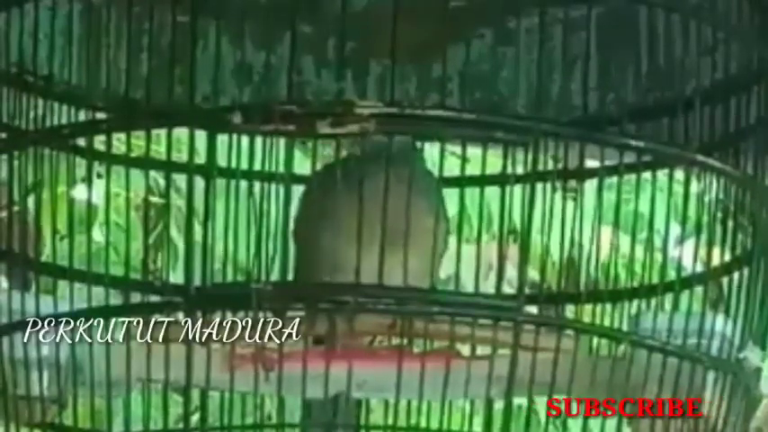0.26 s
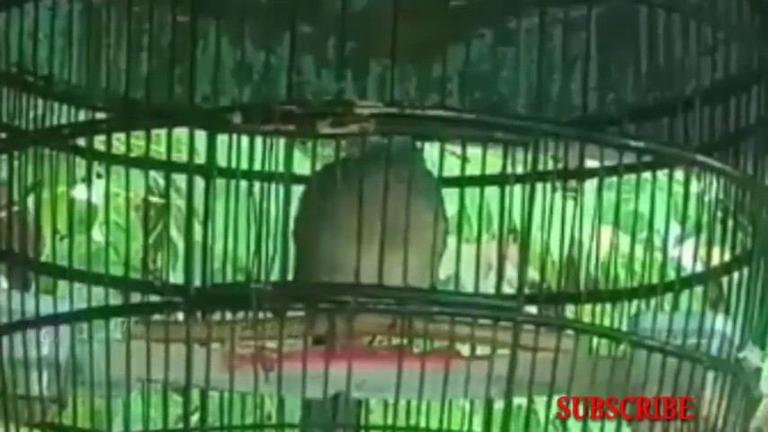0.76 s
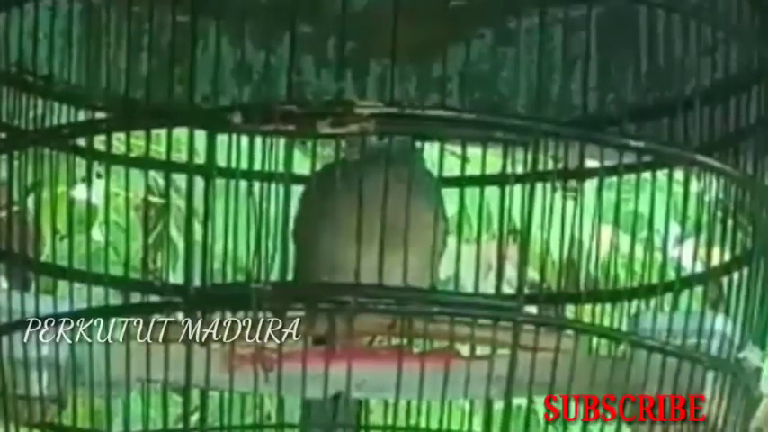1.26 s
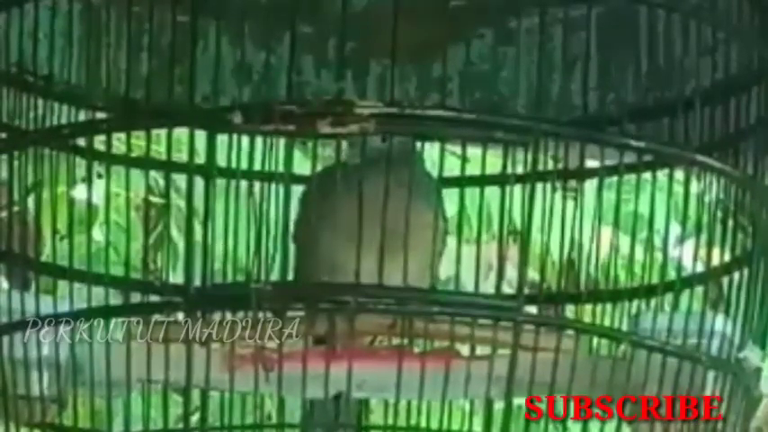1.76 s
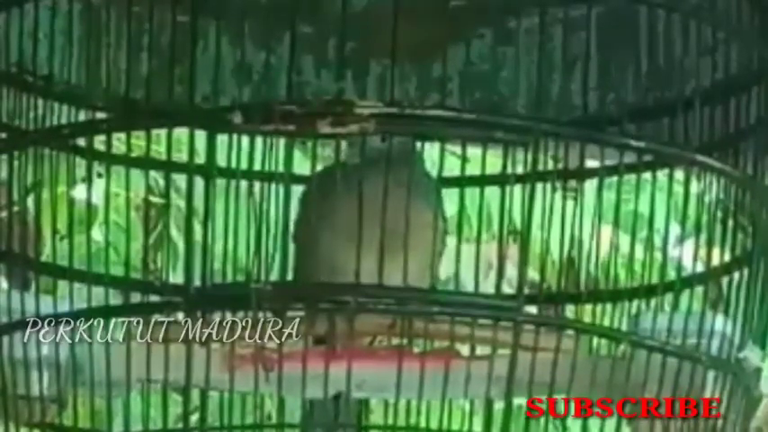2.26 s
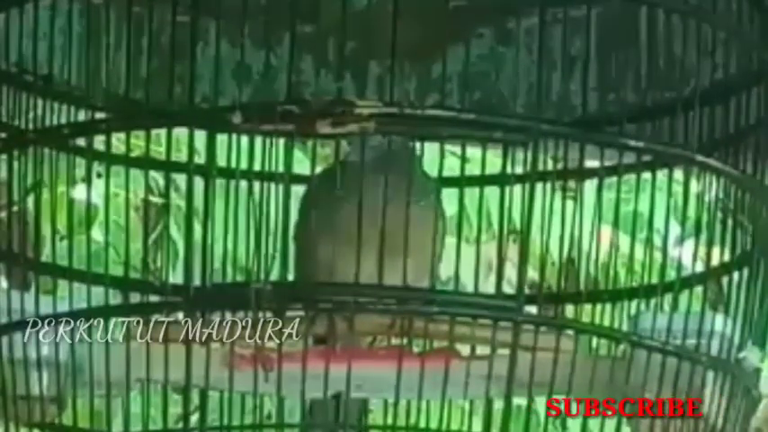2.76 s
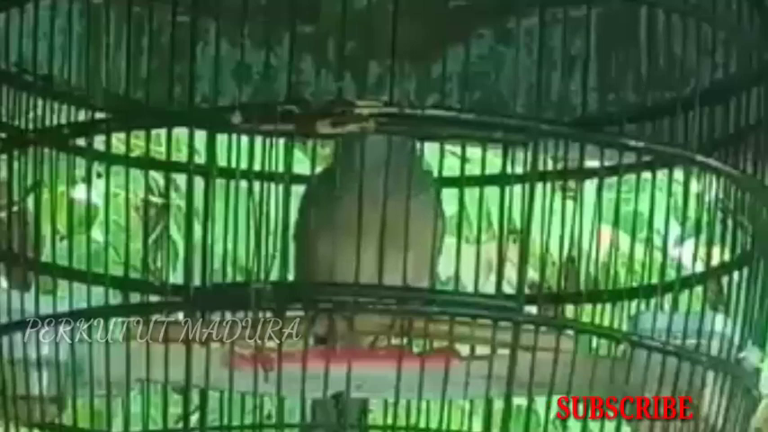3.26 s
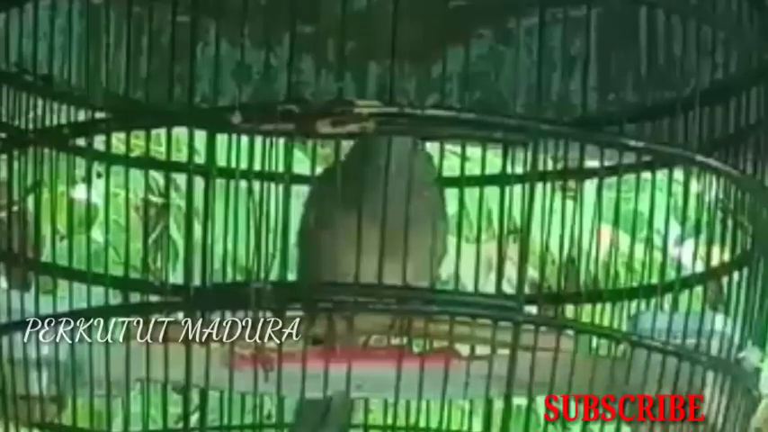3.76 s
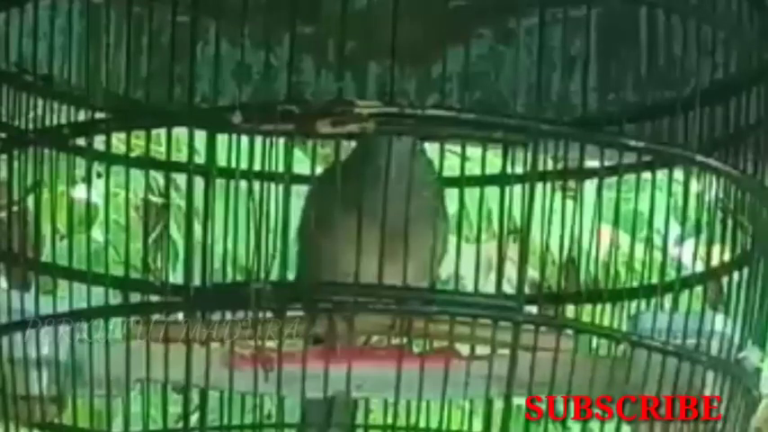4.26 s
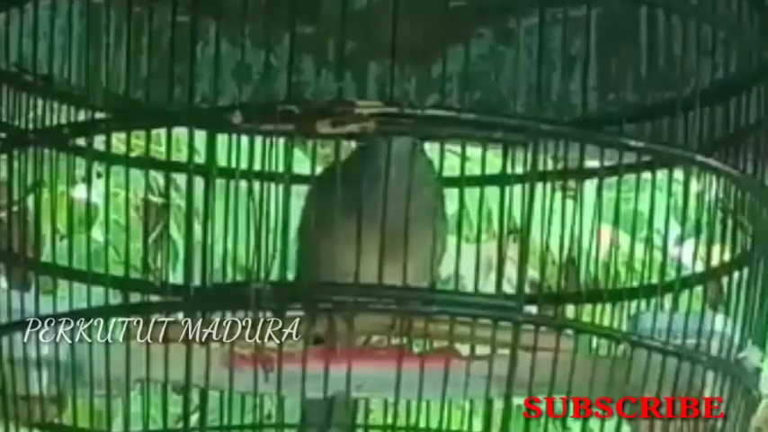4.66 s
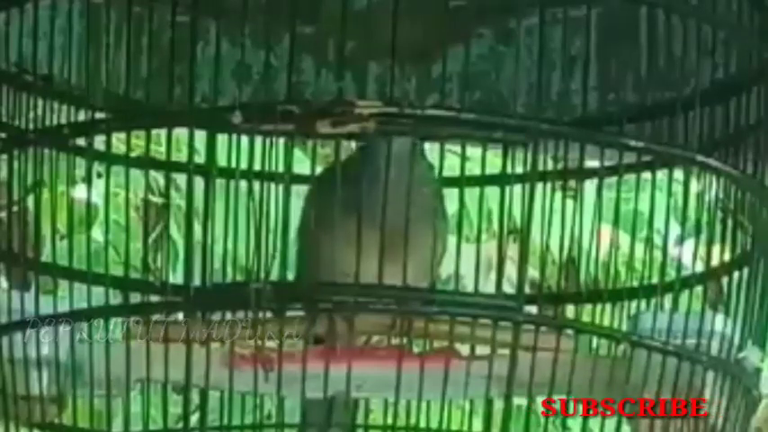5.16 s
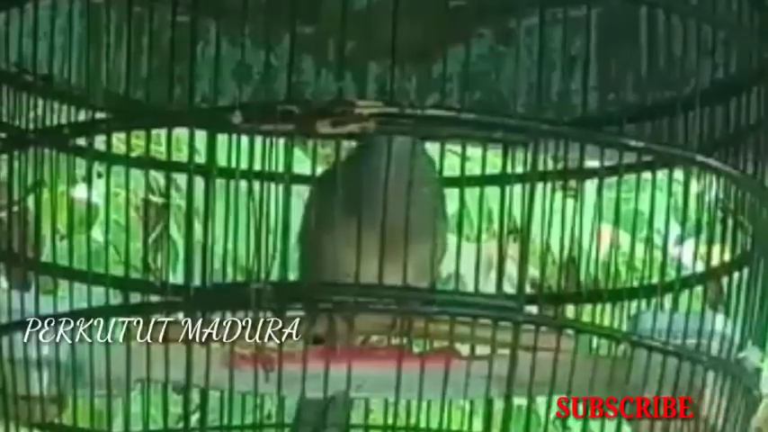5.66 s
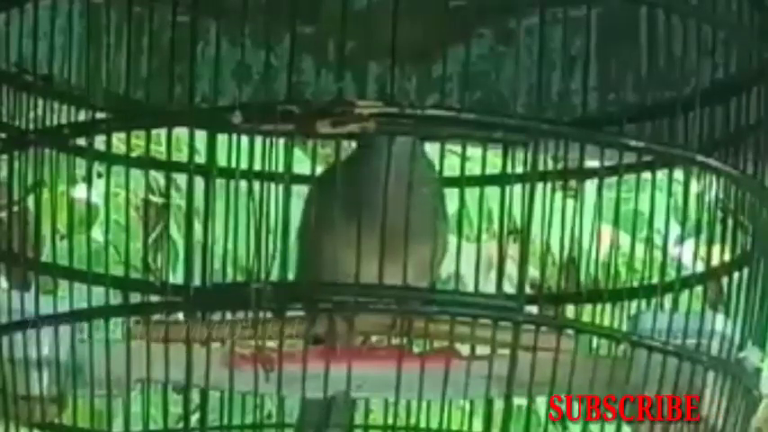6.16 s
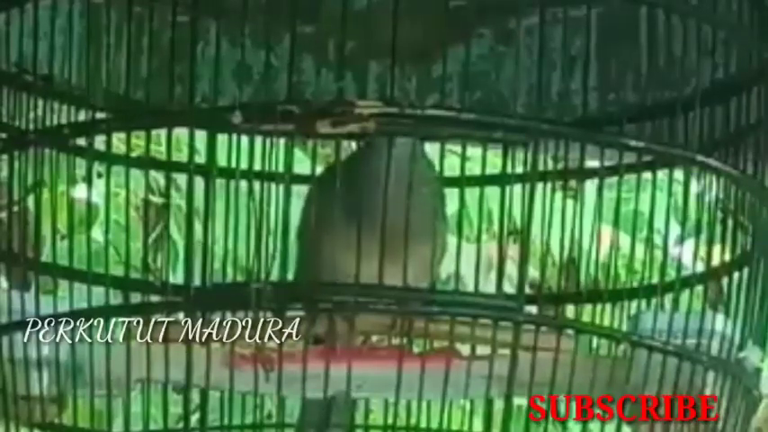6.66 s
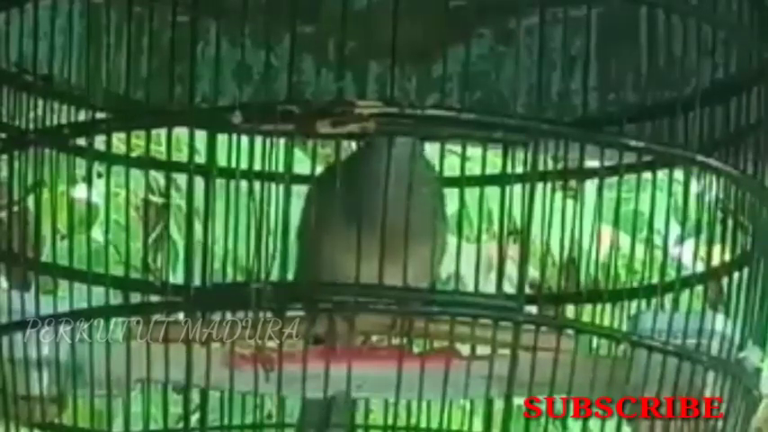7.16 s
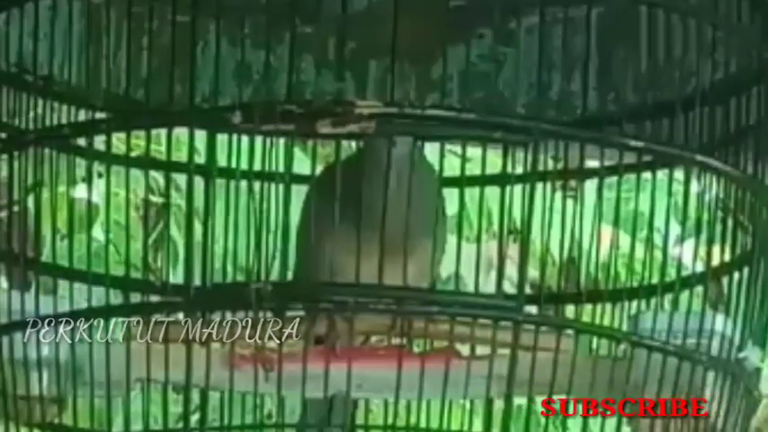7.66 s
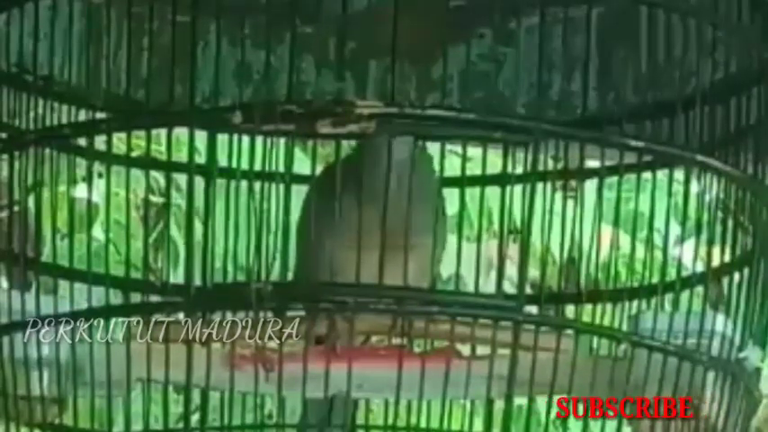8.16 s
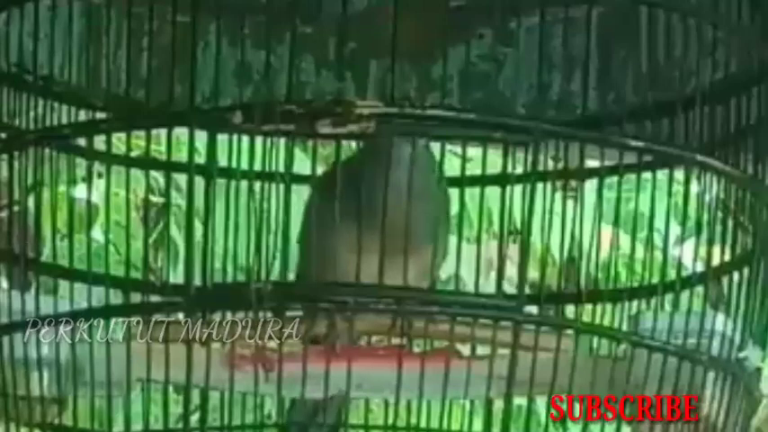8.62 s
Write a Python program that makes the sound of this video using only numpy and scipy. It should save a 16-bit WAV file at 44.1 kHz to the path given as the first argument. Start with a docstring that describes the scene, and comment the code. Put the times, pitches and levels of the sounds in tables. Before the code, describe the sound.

A dove coos four mellow, rolling phrases close by while another answers further off, over faint hiss and engine hum.

```python
"""Zebra doves on a porch

A caged zebra dove coos four phrases on a reverberant porch; a second answers from further off.
Each note is an almost pure tone from the syrinx that scoops up and usually sags; wall echoes beat on it.
A distant engine hums over road rumble, a hiss lies to the left, and there are light ticks and scuffs
on the cage and bright rustles. Small birds twitter far off, and a faint whistle rises at the end."""
import sys
import numpy as np
from scipy import signal
from scipy.fft import rfft, irfft, next_fast_len
from scipy.io import wavfile
from scipy.ndimage import uniform_filter1d

SR = 44100
rng = np.random.default_rng(int(sys.argv[2]) if len(sys.argv) > 2 else 0)


def generate_wav(sig):
    """Save sig (samples, or channels by samples) to the path in sys.argv[1] as 16-bit PCM at SR."""
    pcm = np.round(np.clip(np.atleast_2d(sig).T, -1, 1) * 32767).astype(np.int16)
    wavfile.write(sys.argv[1], SR, pcm)


N = 392049
TIME = np.arange(N) / SR


def from_db(db):
    """Decibels to gain."""
    return 10 ** (np.asarray(db) / 20)


def unit_rms(x):
    """Scale to rms 1."""
    return x / np.sqrt(np.mean(x ** 2) + 1e-20)


def curves(rows):
    """Interpolate rows of (time_s, values...) to every sample, one curve per value column."""
    time_s, *columns = np.transpose(rows)
    return [np.interp(TIME, time_s, column) for column in columns]


def pan(left_db):
    """Ear gains for a left-minus-right level difference."""
    return from_db(np.array([[left_db], [-left_db]]) / 2)


def delayed(x, delay_s):
    """Fractional delay."""
    return np.interp(TIME - delay_s, TIME, x, left=0)


def drift(rate_hz, size=N):
    """Smooth random wander, rms about 1, rolling off above rate_hz."""
    step = 16
    knots = next_fast_len(size // step + 2)
    hz = np.arange(knots // 2 + 1) * SR / step / knots
    spectrum = rfft(rng.standard_normal(knots)) / (1 + (hz / rate_hz) ** 4)
    return np.interp(np.arange(size) / step, np.arange(knots), unit_rms(irfft(spectrum, knots)))


def noise(colour):
    """Noise of rms 1, shaped by rows of (freq_hz, density_db)."""
    size = next_fast_len(N)
    hz, db = np.transpose(colour)
    bin_hz = np.maximum(np.arange(size // 2 + 1) * SR / size, 1)
    low_cut = np.minimum(bin_hz / hz[0], 1) ** 2
    gain = from_db(np.interp(np.log(bin_hz), np.log(hz), db)) * low_cut
    return unit_rms(irfft(rfft(rng.standard_normal(size)) * gain, size)[:N])


def bursts(events, colour, rise_s):
    """Decaying stereo noise puffs from rows of (start_s, level_db, t60_s, left_db)."""
    envelope, t = np.zeros((2, N + SR)), TIME[:SR]
    rise = 1 - np.exp(-t / rise_s)
    for start_s, db, t60_s, left_db in events:
        at = int(start_s * SR)
        envelope[:, at:at + SR] += pan(left_db) * from_db(db - 60 * t / t60_s) * rise
    return envelope[:, :N] * np.array([noise(colour), noise(colour)])


def porch(x, build_s=0.013, t60_s=0.39):
    """Diffuse stereo tail that builds and decays, flattened to favour no pitch."""
    t = TIME[:SR]
    tail = rng.standard_normal((2, SR)) * from_db(-60 * t / t60_s) * (1 - np.exp(-t / build_s))
    response = rfft(tail, 2 * SR)
    response /= np.sqrt(uniform_filter1d(np.abs(response) ** 2, size=80, axis=1))
    return signal.fftconvolve(x[None], irfft(response)[:, :SR], axes=1)[:, :N]


# Engine speed: time_s, cycle_hz
ENGINE_CYCLES = [(0, 28.6), (3, 27.5), (5.7, 21.4), (6.15, 26), (6.55, 23), (7.1, 27.3), (7.5, 30),
                 (7.9, 26.3), (8.2, 28.8), (8.89, 24.7)]
# Engine loudness: time_s, level_db
ENGINE_ENVELOPE = [(0, -42.5), (.5, -41.5), (.75, -44.5), (1.75, -53), (1.95, -37.5), (2.25, -52),
                   (2.95, -38.5), (3.8, -54), (4.2, -40.5), (4.6, -53.5), (5.8, -48), (6.25, -30),
                   (6.75, -46.5), (7.35, -38.5), (8.1, -29), (8.6, -34), (8.89, -35)]


def engine(exhaust_hz=125.1, exhaust_width_hz=26, waver_db=1.0):
    """Orders 4 and 5 throb together as the speed wanders; the exhaust resonance favours the nearer."""
    order_hz = np.outer([4, 5], curves(ENGINE_CYCLES)[0])
    orders = np.sin(2 * np.pi * np.cumsum(order_hz, axis=1) / SR)
    weights = 1 / (1 + (2 * (order_hz - exhaust_hz) / exhaust_width_hz) ** 2)
    hum = np.sum(weights * orders, axis=0) / np.linalg.norm(weights, axis=0)
    return from_db(curves(ENGINE_ENVELOPE)[0] - waver_db * drift(4.4)) * hum


# Road rumble spectrum: freq_hz, density_db
ROAD_COLOUR = [(20, -30), (40, -18), (65, -6.5), (120, 1), (200, -5), (300, -14.5), (450, -19.5),
               (900, -19), (2000, -45)]
# Road rumble loudness: time_s, level_db
ROAD_ENVELOPE = [(0, -45.5), (2, -44), (5, -41), (7.5, -40), (8.89, -41)]


def traffic(surge_db=2.0, scatter_db=-13, lag_s=0.00097):
    """The engine over a surging road rumble, reaching the left ear later."""
    rumble_gain = from_db(curves(ROAD_ENVELOPE)[0] + surge_db * drift(20))
    road = engine() + rumble_gain * noise(ROAD_COLOUR)
    scattered = from_db(scatter_db) * rumble_gain * np.array([noise(ROAD_COLOUR), noise(ROAD_COLOUR)])
    return pan(3.4) * (np.array([delayed(road, lag_s), road]) + scattered)


def patchy(x, depth_db, rate_hz=14, lowest_hz=350):
    """Each of ten half-octave bands swells and sinks on its own; output rms 1."""
    size = next_fast_len(N)
    spectrum, out = rfft(x, size), 0
    bin_hz = np.maximum(np.arange(len(spectrum)) * SR / size, 1)
    band_index = np.clip(2 * np.log2(bin_hz / lowest_hz), 0, 9)
    knots_s = np.arange(0, N / SR + 1, 1 / rate_hz)
    for k in range(10):
        wander = np.interp(TIME, knots_s, rng.standard_normal(len(knots_s)))
        band = irfft(spectrum * np.maximum(1 - np.abs(band_index - k), 0), size)[:N]
        out = out + from_db(depth_db * wander) * band
    return unit_rms(out)


# Hiss spectrum at each ear: freq_hz, density_db
LEFT_HISS_COLOUR = [(300, -34.5), (500, -8.5), (750, -2.5), (1100, 3), (1600, 5.5), (2300, 6.5), (3300, 2),
                    (4800, -1), (6400, -2.5), (8500, -15.5), (11000, -27.5), (15000, -43.5)]
RIGHT_HISS_COLOUR = [(300, -12.5), (500, -14), (800, -9), (1400, -3), (2300, -9.5), (4000, -18.5),
                     (6500, -21.5), (8800, -10.5), (11000, -19), (13000, -23), (15000, -47.5)]


def hiss(left_db=-35.5, right_db=-46.0, flicker_db=1.18, grain_db=0.7):
    """Shifting, slightly grainy hiss on the left; a weaker, steadier one on the right."""
    left_gain = from_db(left_db + flicker_db * drift(19) + grain_db * drift(300))
    left = left_gain * patchy(noise(LEFT_HISS_COLOUR), depth_db=1.7)
    right = from_db(right_db) * patchy(noise(RIGHT_HISS_COLOUR), depth_db=-0.2)
    return np.array([left, right])


# Cage contact spectrum, for scuffs and ticks: freq_hz, density_db
CONTACT_COLOUR = [(600, -30), (1400, 12), (2500, 7), (5500, -5), (8000, -5.5), (15000, -38)]
# Scuffs on the cage: start_s, level_db, t60_s
CAGE_SCUFFS = [(0.206, -30.5, 0.33), (.285, -32, 0.38), (0.803, -23.5, 0.13), (1.07, -28, .2),
               (2.1, -29.5, .35), (2.225, -28, .1), (2.32, -23, 0.08), (2.478, -27.5, 0.43),
               (2.728, -27, 0.15), (2.88, -27, 0.27), (3.262, -27, 0.16), (3.789, -20, 0.27),
               (4.885, -24, 0.2), (7.199, -29.5, 0.76), (8.455, -29.5, 0.58), (8.7, -28.5, 0.27)]


def scuffs(gain_db=-8.0, left_db=11.5, grain_db=1.5):
    """Light scraping on the cage swells softly and fades in grains."""
    rubs = bursts([(*row, left_db) for row in CAGE_SCUFFS], CONTACT_COLOUR, rise_s=0.0055)
    return from_db(gain_db + grain_db * drift(160)) * rubs


# Light knocks on the cage: start_s, level_db, pitch_hz
CAGE_KNOCKS = [(0.2782, -29, 2360), (0.345, -32, 2180), (1.5733, -30, 1980), (1.646, -31.5, 2390),
               (1.688, -28, 1610), (1.71, -27.5, 2240), (2.2318, -30.5, 1720), (2.276, -36, 2830),
               (2.3242, -32.5, 1550), (3.17, -35, 2130), (3.271, -33, 1620), (3.8045, -32, 1940),
               (4.568, -23.5, 2220), (6.0053, -28.5, 1800), (6.517, -29.5, 2090), (6.8947, -38, 2500),
               (6.977, -31, 1560), (7.3307, -32, 2140), (7.3516, -27.5, 2435), (7.656, -26.5, 2304),
               (7.89, -31.5, 2172), (8.194, -32, 2344)]
# Cage bar modes: pitch_ratio, level_db, t60_s
CAGE_MODES = [(0.689, -15.5, 0.028), (0.861, -11.5, .03), (1.002, 0, 0.048), (1.271, -6, 0.027),
              (1.83, -6.5, 0.033), (2.6, -11, 0.024)]


def ringing_bars(gain_db=-4.5, left_db=13.5, tail_db=-11, spread_db=2.5):
    """Each knock rings the bars, every mode at a randomly varied strength."""
    ring, t = np.zeros(N + SR), TIME[:SR // 4]
    for start_s, knock_db, hz in CAGE_KNOCKS:
        at = int(start_s * SR)
        for ratio, mode_db, t60_s in CAGE_MODES:
            peak_db = gain_db + knock_db + mode_db - spread_db * rng.standard_normal()
            decay = from_db(peak_db - 60 * t / t60_s)
            ring[at:at + len(t)] += decay * np.sin(2 * np.pi * hz * ratio * t)
    return pan(left_db) * (ring[:N] + from_db(tail_db) * porch(ring[:N]))


def cage_ticks(crack_db=9.0, noise_gain_db=-10.5, left_db=12.5, t60_s=0.031, patter_count=70):
    """Knocks crack and ring the bars, amid fainter ticks at random times; mostly left."""
    cracks = [(start_s, db + crack_db) for start_s, db, _ in CAGE_KNOCKS]
    patter = [(when * N / SR, -42 + 7 * force ** 2) for when, force in rng.random((patter_count, 2))]
    contacts = [(start_s, db, t60_s, left_db) for start_s, db in cracks + patter]
    return ringing_bars() + from_db(noise_gain_db) * bursts(contacts, CONTACT_COLOUR, rise_s=0.00033)


# Bright rustles: start_s, body_db, top_db, t60_s, left_db
RUSTLE_EVENTS = [(0.344, -45, -54, 0.37, 3), (1.589, -38, -34, 0.087, 1), (1.68, -46, -49, 0.36, -1),
                 (1.776, -35.5, -47, 0.23, 2.5), (1.989, -35.5, -33.5, 0.18, 3), (2.851, -45, -54, 0.34, 1),
                 (3.429, -39, -61, 0.22, 4), (4.037, -30, -40, 0.3, 4), (5.1347, -41, -50, 0.085, 7),
                 (5.232, -50, -43, .08, -5), (5.354, -42.5, -44, 0.24, 3), (6.097, -32, -40, 0.37, 5.5),
                 (6.707, -44, -41, 0.13, -1), (7.942, -44, -41, .12, -5), (8.0, -46, -48, 0.23, 0),
                 (8.312, -46, -42.5, .2, -3), (8.44, -48, -44, 0.1, -8)]
# Spectra of a rustle's body and crisp top: freq_hz, density_db
BODY_COLOUR = [(1500, -2.5), (3500, -0.5), (6000, 9), (9000, 1), (12000, -46), (15000, -21.5)]
TOP_COLOUR = [(6000, -23), (9000, -4), (12000, 3), (15000, -3.5)]


def rustles(grain_db=2.0, body_left_db=5, tail_db=-13):
    """Grainy noise puffs, each with its own share of crisp top; the body lies further left."""
    bodies = [(s, db, t60_s, left_db + body_left_db) for s, db, _, t60_s, left_db in RUSTLE_EVENTS]
    tops = [(s, db, t60_s, left_db) for s, _, db, t60_s, left_db in RUSTLE_EVENTS]
    puffs = bursts(bodies, BODY_COLOUR, rise_s=0.002) + bursts(tops, TOP_COLOUR, rise_s=0.0023)
    direct = from_db(grain_db * drift(350)) * puffs
    return direct + from_db(tail_db) * porch(direct.mean(axis=0))


LEAD_S = 0.026  # usual lead-in before a note's top pitch


def coo(start_s, length_s, top_hz, end_hz, level_db, warble, lead_s, lead_hz,
        attack_s=0.021, release_s=0.022, rest_hz=971, warble_hz=100.7, leap_db=3):
    """One note: the syrinx leaps up, glides to end_hz (usually lower), and relaxes as pressure ends."""
    t = TIME[:int((lead_s + length_s) * SR)] - lead_s  # zero at the top of the leap
    pressure = np.minimum(1 + t / lead_s, 1)
    leap = 0.16 * pressure + 0.84 * pressure ** 8  # gentle climb, then a jump
    glide = np.clip(t / length_s, 0, 1) ** 1.65
    closing = np.clip(1 - (length_s - t) / release_s, 0, 1)
    hz = lead_hz + (top_hz - lead_hz) * leap + (end_hz - top_hz) * glide
    hz += (rest_hz - hz) * 0.54 * closing
    # Pressed notes flutter in pitch and strength together, and are less steady.
    flutter_hz = warble_hz * (1 + 0.22 * drift(24.3, size=SR)[:len(t)])
    flutter = warble * np.sin(2 * np.pi * np.cumsum(flutter_hz) / SR)
    jitter = (0.0025 + 0.043 * warble) * drift(62, size=SR)[:len(t)]
    hz *= 1 + jitter - 0.076 * flutter
    attack = np.minimum((t + lead_s) / attack_s, 1)
    release = np.cos(np.pi / 2 * closing ** 2) ** 2
    envelope = from_db(level_db + leap_db * (leap - 0.5)) * attack * release * (1 + flutter)
    out, at = np.zeros(N + SR), int((start_s - lead_s) * SR)
    out[at:at + len(t)] = envelope * np.sin(2 * np.pi * np.cumsum(hz) / SR)
    return out[:N]


# Far dove's phrase: offset_s, length_s, top_hz, level_db
ANSWER_NOTES = [(0, 0.026, 1020, -30.5), (0.039, .11, 1268, -38), (0.163, 0.0393, 1195, -35.5),
                (0.224, 0.039, 1170, -34), (.32, .04, 1185, -33.5), (.45, 0.021, 1182, -32),
                (0.526, 0.063, 1170, -37.5)]
# Its answers: start_s, gain_db
ANSWERS = [(0.449, 1), (4.198, 0.5), (7.132, 0)]


def far_dove(direct_db=-6.5, tail_db=-3.5, left_db=4, sag_hz=25):
    """The answering bird repeats one phrase in soft, reverberant syllables."""
    voice = np.zeros(N)
    for start_s, gain_db in ANSWERS:
        for offset_s, length_s, top_hz, db in ANSWER_NOTES:
            voice += coo(start_s + offset_s, length_s, top_hz, top_hz - sag_hz, db + gain_db,
                         warble=0.41, lead_s=LEAD_S, lead_hz=985)
    return pan(left_db) * (from_db(direct_db) * voice + from_db(tail_db) * porch(voice))


# Near dove's phrases, rolling and smooth in turn: start_s, lead_hz, rasp_db
SONG_PHRASES = [(0.845, 951, -36.5), (3.41, 983, -35.5), (5.448, 930.6, -35.5), (8.245, 924, -36.5)]
# Its notes, timed from the leap: start_s, length_s, top_hz, end_hz, level_db, warble_depth
SONG_NOTES = [ (.887, 0.12, 1251, 1231, -17.5, 0.17), (1.027, .08, 1177, 1084, -22, 0.2),
              (1.134, 0.042, 1101, 1054, -22.5, 0.55), (1.207, 0.031, 1116, 1095, -22, 0.6),
              (1.295, 0.028, 1174, 1194, -20.5, 0.52), (1.408, 0.044, 1197, 1149, -21.5, 0.69),
              (1.569, 0.067, 1181, 1167, -22, 0.59), (3.464, 0.16, 1039, 1022, -14, .03),
              (3.679, 0.02, 1020, 964, -18.5, 0.13), (3.77, 0.04, 1005, 983, -17, .05),
              (3.894, 0.051, 1157, 996, -17, .28), (3.975, 0.039, 995, 940, -25.5, 0),
              (5.502, 0.06, 1183, 1172, -16.5, 0.13), (5.548, 0.11, 1225, 1196, -17, 0.48),
              (5.687, 0.032, 1187, 1163, -17.5, 0.51), (5.742, 0.039, 1140, 1146, -20, 0.41),
              (5.799, 0.022, 1096, 1050, -15, 0.3), (5.856, .046, 1087, 1063, -20, 0.56),
              (5.924, .067, 1125, 1086, -17.5, 0.45), (5.994, 0.023, 1094, 1000, -22.5, 0.5),
              (6.091, 0.049, 1186, 1182, -22, 0.56), (8.295, 0.14, 1148, 1095, -18.5, 0.17),
              (8.463, 0.071, 1011, 915, -20.5, 0.04), (8.608, 0.028, 1012, 947, -17.5, 0),
              (8.71, 0.056, 1105, 1032, -17.5, 0.2), (8.796, 0.036, 1011, 918, -26, .1)]


def song(opening_lead_s=0.032):
    """The near dove's syrinx: each phrase opens with a slow lead-in; close notes run together."""
    out, last_end_s = np.zeros(N), 0
    ends_s = [phrase[0] for phrase in SONG_PHRASES[1:]] + [np.inf]
    for (begin_s, lead_hz, _), end_s in zip(SONG_PHRASES, ends_s):
        notes = [note for note in SONG_NOTES if begin_s <= note[0] < end_s]
        for k, (start_s, length_s, *voicing) in enumerate(notes):
            lead_s = opening_lead_s if k == 0 else np.clip(start_s - last_end_s, LEAD_S / 2, LEAD_S)
            out += coo(start_s, length_s, *voicing, lead_s, lead_hz)
            last_end_s = start_s + length_s
    return out


def throat(source, band_hz=(825, 1290)):
    """The inflated crop passes only the fundamental."""
    crop = signal.butter(2, band_hz, "band", fs=SR, output="sos")
    return signal.sosfilt(np.vstack([crop, crop]), source)


# Breath turbulence spectrum: freq_hz, density_db
BREATH_COLOUR = [(500, -16.5), (700, -2), (1000, 6.5), (1280, 0.5), (1450, -5.5), (1700, -2), (2500, -52.5)]


def rasps(length_s=0.028, note_gain_db=-22):
    """A puff of turbulence opens each phrase; a fainter one precedes every note."""
    openings = [(start_s, db) for start_s, _, db in SONG_PHRASES]
    catches = [(start_s - LEAD_S, db + note_gain_db) for start_s, _, _, _, db, _ in SONG_NOTES]
    envelope, puff = np.zeros(N + SR), np.hanning(int(length_s * SR))
    for start_s, db in openings + catches:
        at = int(start_s * SR)
        envelope[at:at + len(puff)] += from_db(db) * puff
    return envelope[:N] * noise(BREATH_COLOUR)


def overtone(tone, band_hz=(1880, 2100), gain_db=-1.0, tail_db=-8):
    """Loud low notes raise an octave; high notes only brush its resonance as they dip."""
    resonance = signal.butter(3, band_hz, "band", fs=SR, output="sos")
    octave = from_db(gain_db) * signal.sosfilt(resonance, tone ** 2)
    return octave + from_db(tail_db) * porch(octave)


def echoes(x, walls):
    """Direct sound plus wall reflections."""
    return x + sum(from_db(db) * delayed(x, delay_s) for delay_s, db in walls)


# Wall echoes at each ear: delay_s, gain_db
LEFT_WALLS = [(.0082, -14), (.00881, -9), (0.0276, -8), (0.0422, -10.5), (.06618, -19)]
RIGHT_WALLS = [(.00833, -7.5), (0.0197, -2), (0.0357, -2.5), (.05015, 0.5), (0.0757, -1.5)]


def near_dove(early_db=4.2, tail_db=1.5, left_db=11.5, lag_s=0.00079, low_hz=920, low_width_hz=130):
    """The caged bird with wall echoes and porch tail; panned left, with extra low tones on the right."""
    tone = throat(song())
    voice = tone + rasps()
    low_tones = signal.lfilter(*signal.iirpeak(low_hz, low_hz / low_width_hz, fs=SR), voice)
    left = echoes(delayed(voice, lag_s), LEFT_WALLS)
    right = echoes(voice, RIGHT_WALLS) + low_tones
    early = from_db(early_db) * np.array([left, right])
    tail = from_db(tail_db) * porch(voice, build_s=0.009)
    return pan(left_db) * (early + tail + overtone(tone))


# Small birds far off: start_s, length_s, pitch_hz, level_db
TWITTER_BOUTS = [(1.6, .65, 2940, -40.5), (5.803, 0.51, 4170, -40), (8.553, 0.2, 4090, -37)]


def twitter(syllables_per_s=7, sweep=0.105, jitter=0.055, left_db=-6):
    """Runs of unsteady falling syllables, blurred by the porch."""
    out, waver = np.zeros(N), drift(255)
    for start_s, length_s, hz, db in TWITTER_BOUTS:
        bout = np.sin(np.pi * np.clip((TIME - start_s) / length_s, 0, 1))
        syllable = (TIME - start_s) * syllables_per_s % 1
        phase = 2 * np.pi * np.cumsum(hz * (1 + sweep * (0.5 - syllable) + jitter * waver)) / SR
        out += from_db(db) * bout * np.sin(np.pi * syllable) * np.sin(phase)
    return pan(left_db) * porch(out)


# Faint rising whistle far off: time_s, pitch_hz, level_db
WHISTLE_GLIDE = [(8.45, 2720, -73), (8.51, 2846, -42), (8.65, 3223, -39.5), (8.76, 3540, -34),
                 (8.89, 4000, -41)]


def whistle(jitter=0.026, left_db=11, flicker_db=4.5):
    """A thin, unsteady, flickering glide, smeared by the porch."""
    hz, db = curves(WHISTLE_GLIDE)
    glide = np.sin(2 * np.pi * np.cumsum(hz * (1 + jitter * drift(250))) / SR)
    return pan(left_db) * porch(from_db(db + flicker_db * drift(18)) * glide)


def scene():
    """Both doves over the outdoor background, in stereo."""
    calls = near_dove() + far_dove() + twitter() + whistle()
    return calls + traffic() + hiss() + cage_ticks() + scuffs() + rustles()


def gain_control(x, threshold_db=-18, slope=0.22, ceiling_db=-7.5, window_s=0.026):
    """Gentle compression above the threshold, with a ceiling on the short-term level."""
    size = int(window_s * SR)
    power = uniform_filter1d(np.max(x ** 2, axis=0), size)
    level_db = 10 * np.log10(np.abs(power) + 1e-12)
    compression_db = slope * np.maximum(level_db - threshold_db, 0)
    cut_db = np.maximum(compression_db, level_db - ceiling_db)
    return x * from_db(-uniform_filter1d(cut_db, size))


def record(dry):
    """Gain control, a narrow notch in the treble near 8 kHz, and a steep top cut."""
    notch_hz, cutoff_hz = (7050, 8450), 15600
    notch = signal.butter(2, notch_hz, "bandstop", fs=SR, output="sos")
    top_cut = signal.ellip(10, 0.2, 80, cutoff_hz, fs=SR, output="sos")
    return signal.sosfilt(np.vstack([notch, top_cut]), gain_control(dry))


dry = scene()
out = record(dry)
generate_wav(out)
```